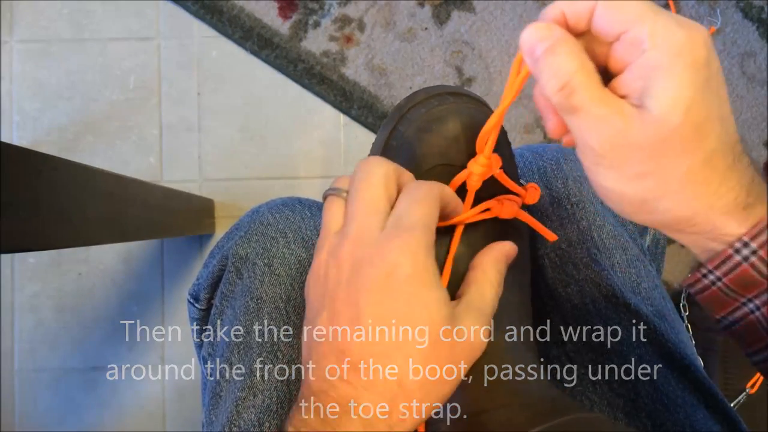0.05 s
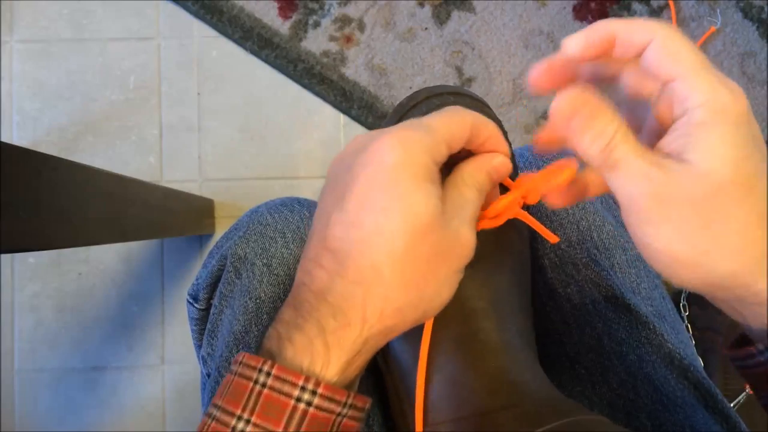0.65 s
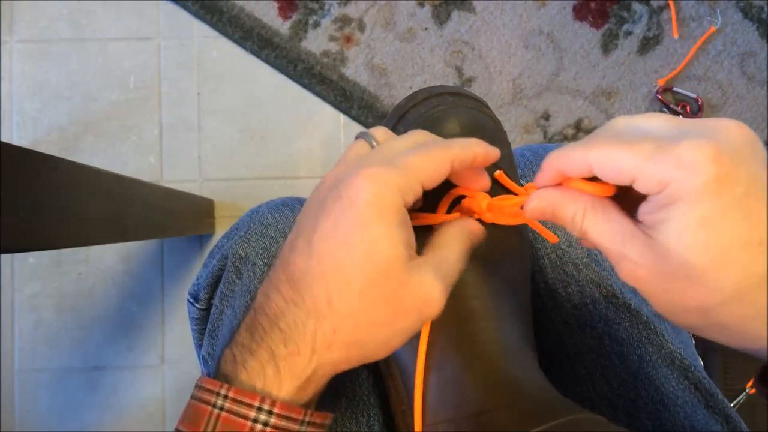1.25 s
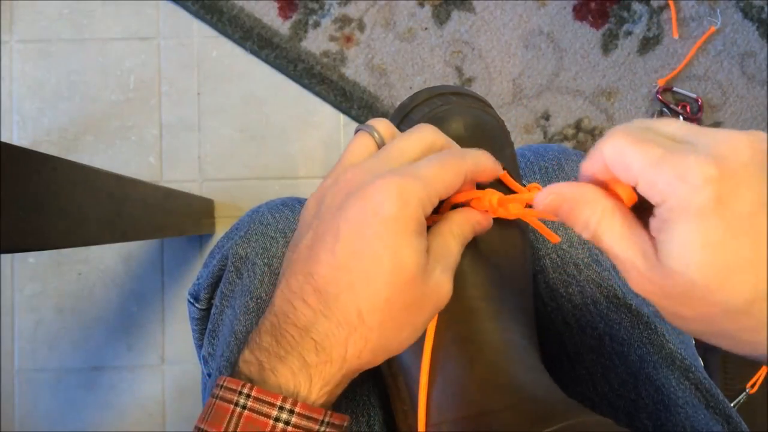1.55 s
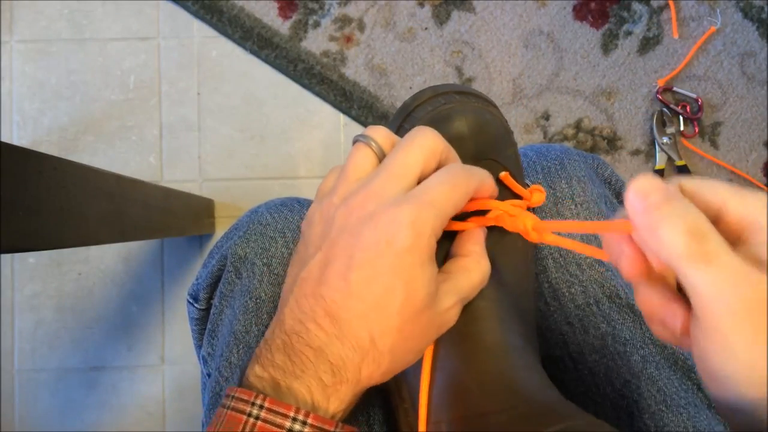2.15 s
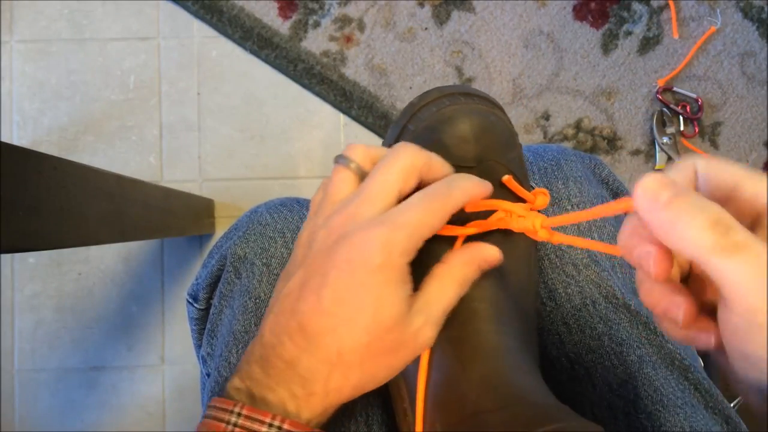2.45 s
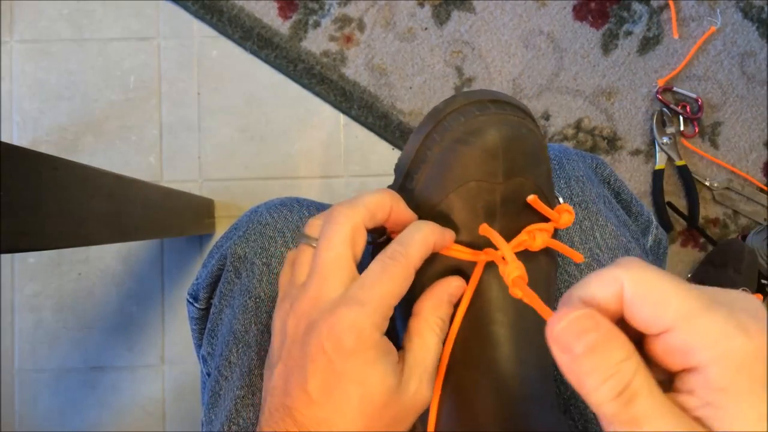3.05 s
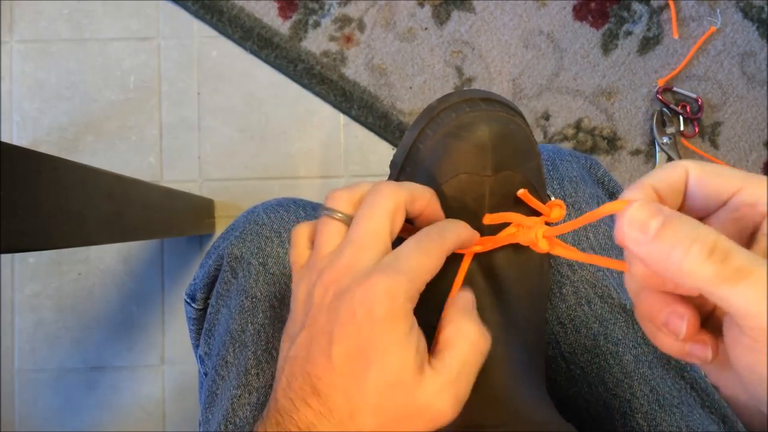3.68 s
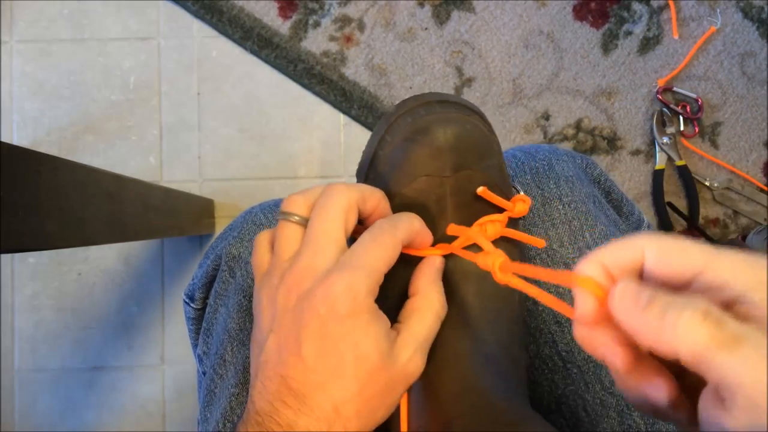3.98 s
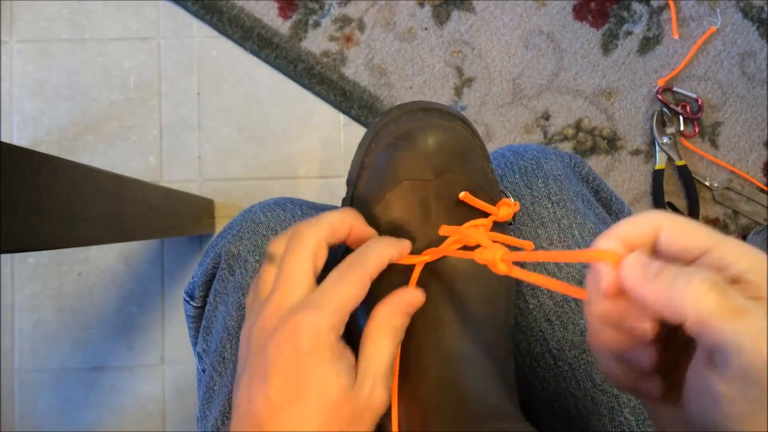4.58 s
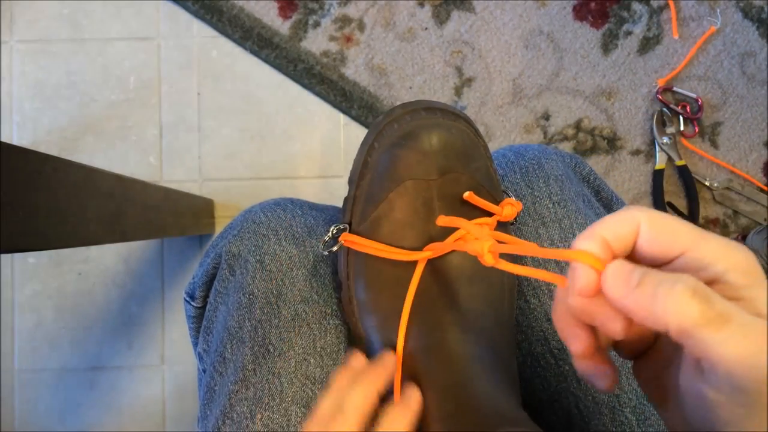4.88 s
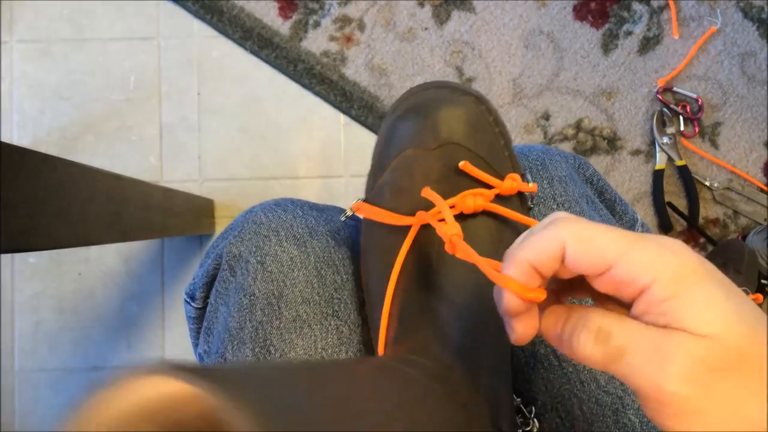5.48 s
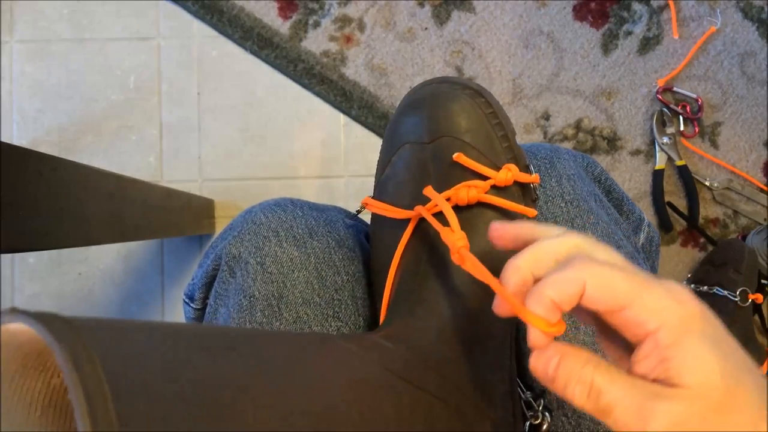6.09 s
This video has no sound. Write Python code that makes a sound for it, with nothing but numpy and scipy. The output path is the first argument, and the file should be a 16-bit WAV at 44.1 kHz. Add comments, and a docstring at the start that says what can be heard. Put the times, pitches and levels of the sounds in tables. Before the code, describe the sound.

Hands pull nylon cord through a knot on a rubber boot, close to the microphone in a quiet room with a steady low hum. Faint, fizzy zips and tiny clicks come first, then one dull, hollow thud stands out. Fingers drag and skid on the rubber, with a sharp cord flick and several softer bumps. Toward the end, sleeves and jeans brush softly as the boot is turned.

```python
"""In a quiet room with a steady hum, hands work nylon cord round a rubber boot that lies on a lap.
Sleeves and jeans brush as the boot is turned. Stick-slip friction makes the cord zip through its knot
and the fingers skid and drag on the rubber. Loudest are the impacts: cord flicks and finger bumps
excite the damped modes of the wall and draw a thud from the hollow boot."""
import sys
import numpy as np
from scipy import signal
from scipy.fft import rfft, irfft
from scipy.io import wavfile

SR = 44100
rng = np.random.default_rng(int(sys.argv[2]) if len(sys.argv) > 2 else 0)


def store_wav(level_fs):
    """Save 16-bit WAV to argv[1]."""
    pcm = np.round(np.clip(np.atleast_2d(level_fs), -1, 1) * 32767)
    wavfile.write(sys.argv[1], SR, pcm.T.astype(np.int16))


N = 279153
TIME = np.arange(N) / SR
FREQS = np.fft.rfftfreq(N, 1 / SR)


def amp(db):
    """Amplitude ratio: tenfold for every 20 dB."""
    return 10 ** (np.asarray(db) / 20)


def unit(x):
    """Normalisation to rms 1."""
    return x / np.sqrt(np.mean(x ** 2) + 1e-20)


def read(points, hz):
    """Interpolation on a log-frequency axis."""
    f, value = np.transpose(points)
    return np.interp(np.log(hz + 1), np.log(f + 1), value)


def add(mix, start_s, sound):
    """Superposition of a delayed sound on the mix."""
    part = mix[round(start_s * SR):][:len(sound)]
    part += sound[:len(part)]


def colour(x, spectrum):
    """Spectral shaping, to rms 1."""
    gain = amp(read(spectrum, np.fft.rfftfreq(len(x), 1 / SR)))
    return unit(irfft(rfft(x) * gain, len(x)))


def follow(curves):
    """Amplitude envelope interpolated from level curves, silent outside them."""
    return sum(np.interp(TIME, times, amp(db), 0, 0) for times, db in map(np.transpose, curves))


def wander(rate_hz):
    """Slow random modulation: low-passed noise of rms 1."""
    return unit(irfft(rfft(rng.standard_normal(N)) * np.exp(-(FREQS / rate_hz) ** 2), N))


def slips(per_s, spread_db):
    """Stick-slip friction as a Poisson train of uneven impulses."""
    size = amp(spread_db * np.minimum(rng.exponential(1, N), 3))
    sign = rng.choice([-1, 1], N)
    return unit(size * sign * (rng.random(N) < per_s / SR))


def stroke(peak_s, duration_s, db, rise_share):
    """Friction grows with speed: one hand movement gives a skewed Gaussian envelope."""
    width_s = duration_s * np.where(TIME < peak_s, rise_share, 1 - rise_share)
    return amp(db) * np.exp(-((TIME - peak_s) / width_s) ** 2 / np.sqrt(2))


def ringing(modes, t):
    """Free vibration as a sum of exponentially damped modes."""
    return sum(amp(db - 60 * t / t60) * np.sin(2 * np.pi * hz * t) for hz, db, t60 in modes)


def background(air_db=-55):
    """Broadband room noise under the forced vibration of an appliance: a drone and a faint whine."""
    # room air and microphone hiss: (frequency [Hz], relative level [dB])
    air_spectrum = [(10, -19), (35, -21), (62, -1.5), (105, -3), (130, -6), (160, -5.5), (195, 1),
                    (280, -8), (400, -12.5), (600, -19.5), (1000, -25), (1500, -27.5), (2100, -32),
                    (4900, -36.5), (9000, -40.5), (15200, -40)]
    # appliance tones: (frequency [Hz], level [dB])
    hum_tones = [(59.4, -61), (84, -68), (120, -73.5), (160.25, -55), (179.5, -63), (209, -67),
                 (278.5, -67.5), (4151, -89.5), (4921, -92)]
    air = amp(air_db) * colour(rng.standard_normal(N), air_spectrum)
    drift_rad = .2 * wander(rate_hz=2)
    hum = np.zeros(N)
    for hz, db in hum_tones:
        phase = 2 * np.pi * (hz * TIME + rng.random()) + drift_rad * np.sqrt(hz / hum_tones[0][0])
        hum += amp(db) * unit(np.cos(phase))
    return air + hum


def room(x, gap_s=.016, echoes_per_s=2500):
    """Reverberation: sparse reflections of a small room, each band absorbed at its own rate."""
    # reverberation times: (frequency [Hz], T60 [s])
    decay_times = [(100, 0.59), (500, 0.21), (3000, 0.59), (14000, 0.16)]
    t = TIME[:SR // 2]
    echoes = rng.choice([-1., 1.], len(t)) * (rng.random(len(t)) < echoes_per_s / SR) * (t > gap_s)
    hz, delay_s, bands = signal.stft(echoes, SR, nperseg=256)
    decay = amp(-60 * delay_s / read(decay_times, hz)[:, None])
    tail = signal.istft(bands * decay, SR, nperseg=256)[1]
    return signal.oaconvolve(x, tail / np.linalg.norm(tail))[:N]


def cloth(uneven_db=2.8):
    """Friction noise: sleeves and jeans brush softly, thread over thread."""
    # brushing as the knot is drawn tight, then as the boot is turned: (time [s], level [dB])
    brush_curves = [
        [(2.22, -86), (2.37, -67.5), (2.43, -86), (2.95, -71), (3.14, -90), (3.3, -68.5), (3.37, -85),
         (3.74, -72)],
        [(3.85, -84), (3.92, -60), (4.02, -69), (4.18, -96), (4.25, -74), (4.42, -64), (4.53, -75), (4.65, -60),
         (4.71, -70), (4.87, -65), (5.25, -67.5), (5.42, -68), (5.48, -59), (5.57, -61.5), (5.68, -89),
         (5.85, -74.5), (6.33, -74)],
    ]
    # rubbed fabric: (frequency [Hz], relative level [dB])
    brush_spectrum = [(300, 12.5), (900, 8.5), (1500, 3.5), (2300, 3.5), (3000, 4), (3700, 4), (4300, 3.5),
                      (4900, 3.5), (6200, -2), (7500, -4), (11000, -13), (15500, -9.5)]
    threads = colour(slips(per_s=7000, spread_db=2), brush_spectrum)
    return follow(brush_curves) * amp(uneven_db * wander(rate_hz=23)) * threads


def dull_scuffing(gain_db=-2, uneven_db=2):
    """Sparse stick-slip scuffs dully: fingers fumble at first, later the boot shifts on the jeans."""
    # one curve for the fingers, one for the boot on the jeans: (time [s], relative level [dB])
    scuffing_curves = [
        [(0.1, -76), (0.2, -63), (0.36, -80), (0.55, -62)],
        [(5.72, -82), (6.02, -58), (6.08, -66), (6.33, -59)],
    ]
    # dull scuffing: (frequency [Hz], relative level [dB])
    scuffing_spectrum = [(300, 11.5), (800, 5.5), (1300, 1.5), (1500, -9), (1750, -0.5), (2100, -10),
                         (2650, -9), (3500, -8.5), (9000, -24)]
    envelope = follow(scuffing_curves) * amp(gain_db + uneven_db * wander(rate_hz=18))
    return envelope * colour(slips(per_s=1200, spread_db=0), scuffing_spectrum)


def creaks(level_db=-88, decay_s=.003):
    """Release of tension: nylon fibres slip now and then with tiny, high crackles."""
    t = TIME[:SR // 40]
    burst = rng.standard_normal(len(t)) * np.exp(-t / decay_s)
    crackle = colour(burst, [(2000, -24), (6000, -26), (12500, 1), (15500, -10)])
    fibres = slips(per_s=16, spread_db=2)
    return amp(level_db) * unit(signal.oaconvolve(fibres, crackle)[:N])


def ticks(decay_s=0.0014, skirt_db=-22):
    """Impact transients: each short, hard contact is a burst of noise round one frequency."""
    # nails and cord ends: (time [s], peak level [dB], centre frequency [Hz])
    contacts = [(0.389, -53.5, 7700), (0.423, -50.5, 870), (0.794, -54, 796), (2.14, -50.5, 13500),
                (2.214, -56, 1100), (2.665, -56, 3500), (2.887, -42.5, 1880), (3.488, -55, 3200),
                (5.851, -54.5, 5950), (5.888, -50.5, 1880), (5.953, -58, 1000)]
    out, t = np.zeros(N), TIME[:SR // 40]
    for start_s, db, hz in contacts:
        grit = colour(rng.standard_normal(len(t)), [(hz / 2, skirt_db), (hz, 0), (hz * 2, skirt_db)])
        ping = grit * np.exp(-t / decay_s)
        add(out, start_s, amp(db) * ping / np.abs(ping).max())
    return out


def skids(width_hz=900):
    """Nearly periodic stick-slip: a noise band round the slip rate, gliding as a finger changes speed."""
    # skin on cord and rubber: (peak time [s], duration [s], level [dB], pitch [Hz], glide [octaves/s])
    slides = [(1.565, 0.042, -64.5, 4020, 4.5), (1.61, .022, -64, 5700, 2.5), (1.68, 0.021, -68, 1476, -5),
              (2.253, 0.053, -64, 1557, 3), (3.304, .03, -64.5, 1760, -0.5),
              (3.937, 0.055, -61.5, 1522, 4.5), (3.973, .045, -66.5, 3370, 0),
              (4.027, 0.02, -66.5, 1503, 2), (4.296, 0.02, -55.5, 1192, -4.5), (4.644, .047, -67, 4670, -1),
              (4.9, 0.098, -71, 1472, 0), (5.108, 0.036, -60.5, 2007, 11.5), (5.36, 0.027, -66.5, 1780, 8),
              (5.56, 0.1, -70, 3860, -0.5)]
    out, pole = np.zeros(N), np.exp(-np.pi * width_hz / SR)
    ridges = slips(per_s=7000, spread_db=1.5)
    low_noise = unit(signal.lfilter([1], np.poly([pole, pole]), ridges))
    for peak_s, duration_s, db, hz, glide in slides:
        pitch = hz * 2 ** np.clip(glide * (TIME - peak_s), -1, 1)
        band = unit(low_noise * np.cos(2 * np.pi * np.cumsum(pitch) / SR))
        out += stroke(peak_s, duration_s, db, rise_share=0.6) * band
    return out


def zips():
    """Roughness noise: the braid's fine ribs catch in a bright fizz; overlapping pulls add in power."""
    # cord sliding over cord: (peak time [s], duration [s], level [dB])
    pulls = [(0.22, .06, -70), (0.634, 0.034, -54), (0.666, 0.011, -54.5), (0.775, .05, -68),
             (1.28, .015, -66), (1.519, 0.017, -59.5), (1.573, 0.072, -53.5), (1.688, .035, -58.5),
             (1.84, 0.16, -62), (2.049, .012, -59), (2.142, 0.029, -56.5), (2.244, .05, -62.5),
             (2.525, 0.13, -62.5), (2.837, 0.074, -61), (2.862, 0.016, -47), (2.89, 0.0062, -49),
             (3.721, .016, -59.5), (3.935, .03, -57.5), (4.07, .05, -65), (4.65, 0.1, -61),
             (4.933, 0.17, -64.5), (5.119, .013, -54), (5.2, 0.098, -62), (5.526, 0.074, -62)]
    # rubbed braid: (frequency [Hz], relative level [dB])
    braid_spectrum = [(600, 1), (2000, -1.5), (3200, -0.5), (5200, 5.5), (8000, 1.5), (11000, 0.5),
                      (14500, 2.5), (16000, 11.5)]
    speed = np.sqrt(sum(stroke(*pull, rise_share=0.38) ** 2 for pull in pulls))
    return speed * colour(slips(per_s=28000, spread_db=4.5), braid_spectrum)


def wall_ring(contact_s=0.00069):
    """Impulse response of the boot wall; soft rubber takes a moment to give."""
    # wall resonances: (frequency [Hz], relative level [dB], T60 [s])
    wall_modes = [(274.8, 6, 0.052), (375, 2.5, 0.027), (460, -0.5, 0.024), (540.4, -3, 0.053),
                  (575.4, -8.5, 0.026), (829, -12, 0.048), (1493, -16.5, 0.032), (2620, -8, 0.0043)]
    t = TIME[:SR // 8]
    return ringing(wall_modes, t) * (1 - np.exp(-t / contact_s))


def nudges(level_db=-69):
    """Impulse excitation: the holding hand touches the wall lightly at random moments."""
    touches = slips(per_s=14, spread_db=1)
    return amp(level_db) * unit(signal.oaconvolve(touches, wall_ring())[:N])


def drags():
    """Stick-slip drives a resonator: every slip of the fingers taps the boot wall."""
    # rubber dragging under the hand: (peak time [s], duration [s], level [dB])
    rubs = [(0.634, .035, -54), (1.675, 0.054, -53.5), (1.895, 0.18, -57), (2.13, 0.063, -45),
            (2.268, 0.096, -48), (2.367, 0.037, -47.5), (2.602, .12, -56.5), (2.89, 0.15, -51),
            (3.044, 0.049, -55), (3.287, 0.07, -44.5), (3.464, .02, -56), (3.677, 0.16, -57),
            (4.068, 0.13, -52), (4.394, .028, -43), (4.479, .025, -48.5), (4.866, 0.5, -59.5),
            (5.848, 0.091, -58), (6.025, .05, -54)]
    speed = sum(stroke(*rub, rise_share=0.57) for rub in rubs)
    force = speed * slips(per_s=900, spread_db=3.5)
    ring = wall_ring()
    return signal.oaconvolve(force, ring / np.linalg.norm(ring))[:N]


def knocks(swell_cycles=1.08, stiffening=2, relax_s=.0014, ring_lag_s=0.00096):
    """Impact excitation: a snap, a ringing wall and a hollow thud that sags as the rubber relaxes."""
    # cord flicks and finger bumps:
    # (time [s], thud level [dB], settled pitch [Hz], snap gain re thud [dB])
    impacts = [(0.661, -43.5, 291, -3), (2.048, -35.5, 223, -22), (2.1067, -16, 213.5, -12.5),
               (2.15, -39, 280, -18), (2.8615, -40.5, 355, -1), (2.869, -43, 333, -24),
               (2.8859, -25, 249, -16), (3.019, -50, 325, -24), (3.053, -42, 275, -32),
               (3.209, -46, 334, -12), (3.272, -37.5, 265, -34), (3.291, -42.5, 393, -20),
               (3.574, -43, 242, -35), (3.859, -40.5, 180, -21), (4.065, -35.5, 216, -18),
               (4.3801, -27.5, 253, -23), (4.4486, -45, 360, -18), (4.467, -34.5, 235, -30),
               (4.829, -42.5, 200, -30), (4.912, -33.5, 207, -32), (5.0234, -34.5, 204, -31),
               (5.049, -42.5, 239, -36)]
    # crack of cord on rubber: (frequency [Hz], relative level [dB], T60 [s])
    crack_modes = [(1420, -3, 0.0033), (2940, 6, 0.003), (3530, -6, 0.013), (4620, -1.5, 0.0096),
                   (6500, -3, .008), (7070, -7, 0.0068), (10400, -4, .003), (13800, -4, .003)]
    # scuff at contact: (frequency [Hz], relative level [dB])
    scuff_spectrum = [(500, 12), (2000, -5), (3000, 3), (5200, 4), (8000, -2), (14500, -16)]
    crack_db, crack_rise_s = -8, 0.00023
    scuff_db, scuff_s = -21, 0.015
    typical_hz, typical_snap_db = 243, -18
    out, t, ring = np.zeros(N), TIME[:SR // 8], wall_ring()
    crack = amp(crack_db) * ringing(crack_modes, t) * (1 - np.exp(-t / crack_rise_s))
    for start_s, db, hz, snap_db in impacts:
        swell_s = swell_cycles / hz
        envelope = (t / swell_s * np.exp(1 - t / swell_s)) ** 2
        pitch = hz * (1 + stiffening * np.exp(-t / relax_s))
        thud = -envelope * np.cos(2 * np.pi * np.cumsum(pitch) / SR)
        scuff = amp(scuff_db) * np.exp(-t / scuff_s) * colour(rng.standard_normal(len(t)), scuff_spectrum)
        add(out, start_s, amp(db) * (thud + amp(snap_db) * (crack + scuff)))
        # stiffer spots (higher pitch) and harder contacts (more snap) ring the wall more
        ring_db = -11.5 + 14 * np.log2(hz / typical_hz) + 0.3061 * (snap_db - typical_snap_db)
        add(out, start_s + ring_lag_s, amp(db + ring_db) * ring)
    return out


def scene(rub_room_db=-14, blow_room_db=-18):
    """Superposition: close handling sounds and their weak reverberation, over the hum."""
    blows = knocks() + nudges()
    rubs = drags() + zips() + skids() + ticks() + cloth() + dull_scuffing() + creaks()
    reverberation = room(amp(blow_room_db) * blows + amp(rub_room_db) * rubs)
    return (blows + rubs + reverberation + background())[None]


def record(dry, cutoff_hz=15400):
    """Resonances of the microphone housing colour the sound; a low-pass filter limits the band."""
    # housing peaks and dips: (frequency [Hz], bandwidth [Hz], gain [dB])
    housing = [(613, 21, 6), (1451, 75, 7.5), (2680, 390, 3), (2970, 380, -2), (3650, 340, 1.5),
               (4040, 170, -7), (4780, 230, 2), (5560, 290, -0.5), (6030, 210, 3)]
    for hz, width_hz, db in housing:
        band = signal.lfilter(*signal.iirpeak(hz, hz / width_hz, SR), dry)
        dry = dry + (amp(db) - 1) * band
    low_pass = signal.firwin(511, cutoff_hz, window=("kaiser", 8), fs=SR)
    return signal.oaconvolve(dry, low_pass[None], "same")


dry = scene()
out = record(dry)
store_wav(out)
```